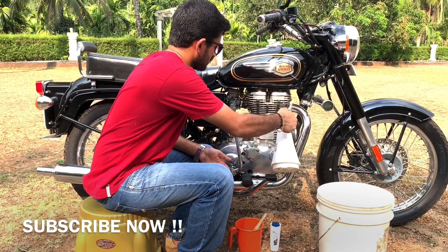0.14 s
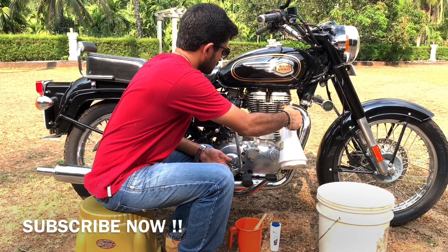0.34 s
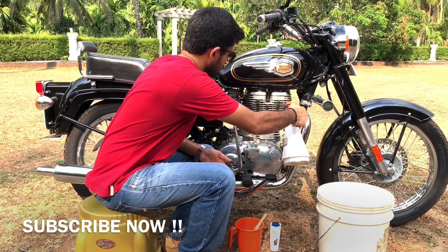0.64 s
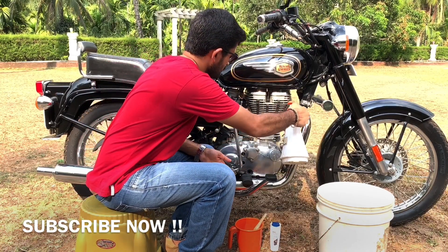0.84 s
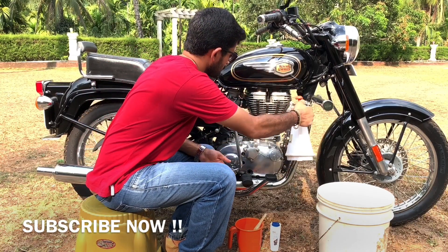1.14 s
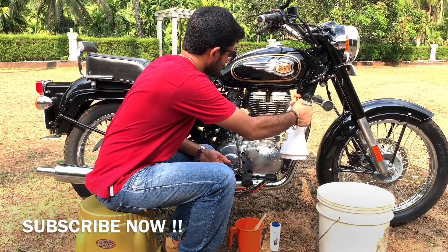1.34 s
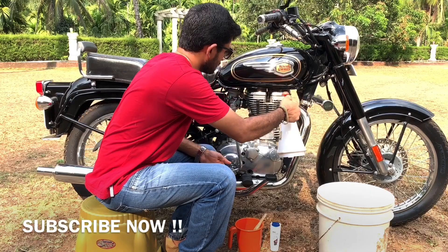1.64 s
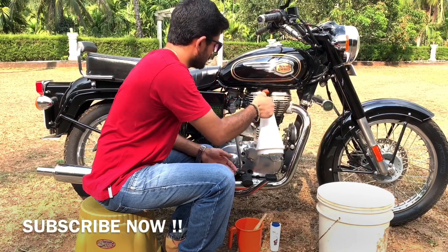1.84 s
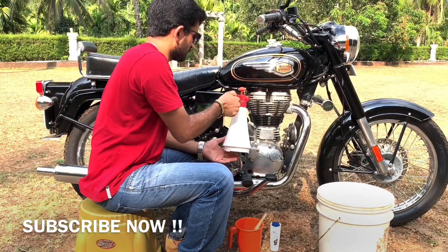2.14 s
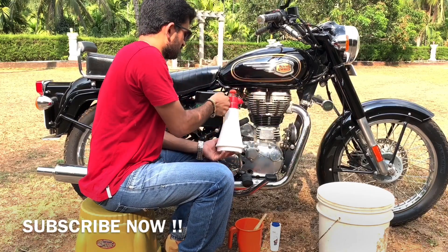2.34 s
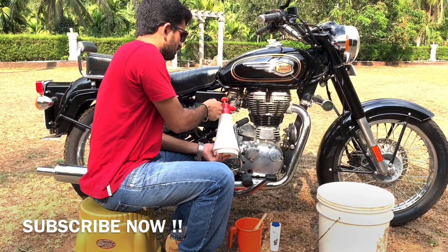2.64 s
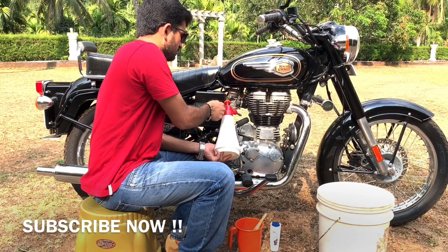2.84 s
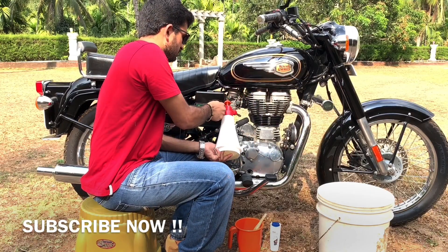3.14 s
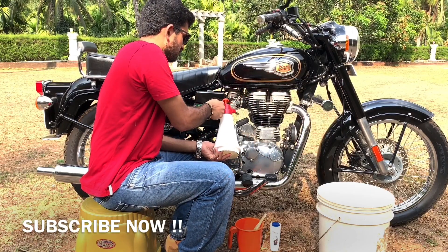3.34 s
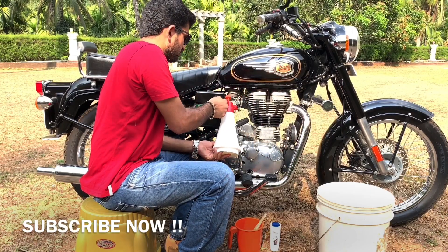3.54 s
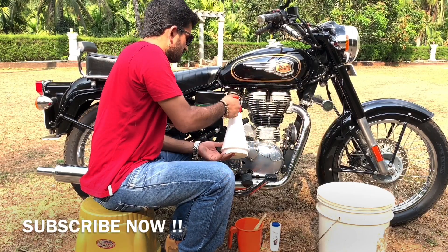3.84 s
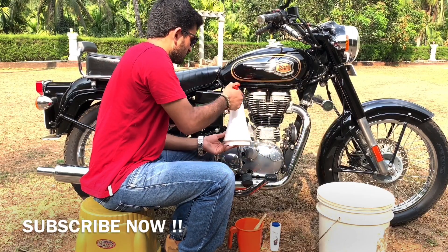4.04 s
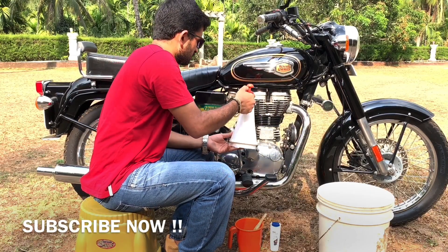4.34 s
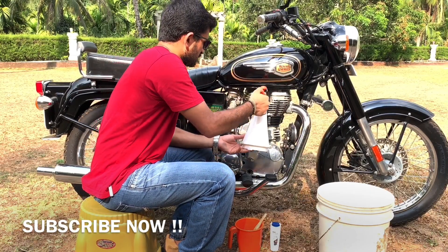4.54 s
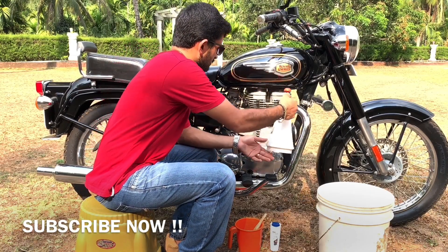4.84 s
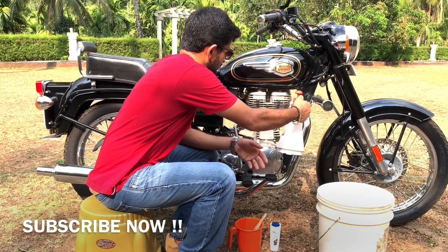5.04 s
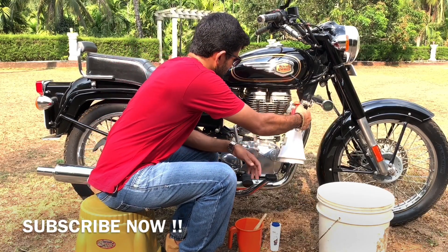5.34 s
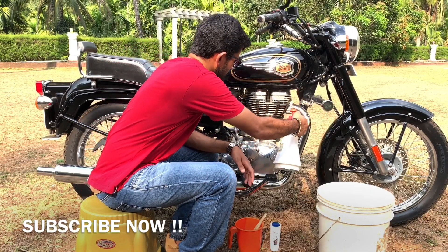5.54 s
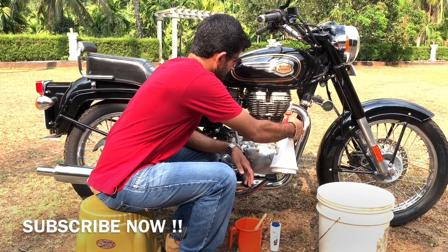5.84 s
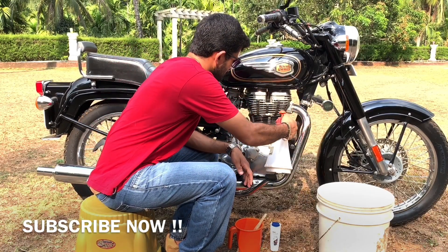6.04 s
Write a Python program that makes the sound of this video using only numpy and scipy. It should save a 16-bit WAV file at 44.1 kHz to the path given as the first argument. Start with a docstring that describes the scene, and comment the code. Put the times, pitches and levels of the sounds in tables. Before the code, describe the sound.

Close, steady fine spray hiss, shifting in colour and briefly faltering, over a quiet garden; midway, small plastic trigger ticks and dull wind thumps.

```python
"""A fine mist hisses, sputters and falters in a garden, a few steps from the microphone: a hand sprayer on an engine.
The spray is noise roughened by droplet hits, in three bands (hiss, patter, low body), coloured by echoes off
fins and covers as the nozzle wanders. The trigger ticks a few times: decaying rings, knocks and noise cracks.
Far off lie a wavering sine hum, a brief low tone and a noise murmur of leaves and traffic.
A light breeze, then a gust, buffets the microphone: low noise and short thumps."""
import sys
import numpy as np
from scipy import signal
from scipy.fft import rfft, irfft, next_fast_len
from scipy.io import wavfile
from scipy.ndimage import uniform_filter1d, map_coordinates

SR = 44100
rng = np.random.default_rng(int(sys.argv[2]) if len(sys.argv) > 2 else 0)


def wav_out(sig):
    """Save sig, one row per channel (or a flat mono array), as 16-bit PCM at SR to the path in sys.argv[1]."""
    wavfile.write(sys.argv[1], SR, np.round(np.clip(np.atleast_2d(sig).T, -1, 1) * 32767).astype(np.int16))


N = 272538

# Murmur of far leaves and traffic. Each row: time in seconds, level in dB.
GARDEN_LEVEL = [(0, -54.5), (1.3, -59), (3, -55.5), (6.18, -61)]
# Its spectrum. Each row: frequency in Hz, relative density in dB per Hz.
GARDEN_SPECTRUM = [(60, -11), (100, 2), (160, -2), (220, -7), (310, -6.5), (450, -10), (700, -12),
                   (2000, -22), (8000, -92)]
# Distant hum, swelling and sinking away. Each row: time in seconds, level in dB.
HUM_LEVEL = [(0, -76), (.9, -77), (1.2, -59), (1.7, -69), (2.05, -57.5), (2.7, -64), (2.97, -56),
             (3.1, -70), (3.53, -57.5), (3.8, -82)]
# Brief low tone from far off. One row: start in seconds, end in seconds, pitch in Hz, level in dB.
FAR_TONE = (0.4, .72, 306, -67)
# A light breeze, then the gust. Each row: time in seconds, level in dB.
WIND_LEVEL = [(0, -68), (.6, -59.5), (.9, -65.5), (1.2, -57), (1.6, -61), (3.7, -61.5), (3.82, -58),
              (3.89, -45), (3.99, -36), (4.29, -36.5), (4.36, -39), (4.42, -34.5), (4.65, -43),
              (4.93, -34.5), (5.04, -52), (5.1, -35), (5.19, -45), (5.45, -28.5), (5.53, -46),
              (5.61, -37.5), (5.9, -52.5), (6.18, -55)]
# Wind on the microphone. Each row: frequency in Hz, relative density in dB per Hz.
WIND_SPECTRUM = [(15, -40), (25, -14), (40, 0), (55, 4), (80, -1.5), (120, -19), (170, -24.5), (260, -53),
                 (400, -90)]
# Eddies that strike the microphone. Each row: centre in seconds, peak of the swell in dB, pitch in Hz.
THUMPS = [(1.268, -33, 58.4), (4.024, -17.5, 68.4), (4.107, -25, 75), (4.267, -24, 55.3),
          (4.408, -23.5, 54), (4.56, -25, 66), (4.877, -27, 76), (5.362, -29, 60.5), (5.419, -21.5, 56),
          (5.457, -23, 69), (5.621, -30.5, 58.6)]
# Trigger ticks. Each row: start in seconds, peak of the ring in dB, ring in Hz.
TICKS = [(4.078, -30.5, 1340), (4.2642, -32, 1340), (4.3266, -23.5, 2200), (4.504, -32, 1330),
         (4.5634, -24.5, 2280), (5.0569, -33, 1960)]
# The jet as the aim wanders. Each row: time in seconds, level of the hiss in dB, of the patter in dB,
# of the low body in dB, weight of the lower hiss in dB.
FLOW = [(0, -26.5, -37.5, -50, 5), (.2, -24.5, -33.5, -46.5, -2.5), (.45, -24.5, -41, -48.5, -1.5),
        (.65, -21, -36, -45, -0.5), (.95, -27.5, -37.5, -50, -1), (1.3, -22.5, -36.5, -49.5, 0.5),
        (1.7, -25, -37.5, -49, 0), (2.05, -19.5, -37, -49.5, -1), (2.4, -22.5, -38, -48.5, 4),
        (2.75, -21.5, -37.5, -48, 3.5), (3.05, -22.5, -36.5, -45.5, 4.5), (3.3, -20.5, -38, -47.5, 2.5),
        (3.7, -23.5, -37, -50, 2.5), (3.85, -21.5, -36, -49, 0.5), (3.97, -31, -49.5, -56.5, -1.5),
        (4.08, -25, -40, -47.5, 4), (4.32, -21, -36.5, -49, -6.5), (4.5, -25.5, -39.5, -49, 1),
        (4.85, -24, -37.5, -47.5, -3), (5.05, -24, -38, -49.5, -3), (5.45, -23.5, -37, -46.5, -6.5),
        (5.8, -25.5, -37.5, -46.5, 0.5), (6.18, -25, -37.5, -46, 1)]
# Spectra of the three layers. Each row: frequency in Hz, relative density in dB per Hz.
HISS_SPECTRUM = [(3500, -26), (5000, -14.5), (6200, -8), (7400, -2.5), (8000, -0.5), (9200, -1), (11000, 1),
                 (12500, -2), (15700, 0.5)]
PATTER_SPECTRUM = [(600, -40), (900, -3), (1500, 0), (2600, 1), (3300, 1.5), (4500, -0.5), (6000, -4),
                   (8000, -54)]
BODY_SPECTRUM = [(250, -24), (420, -6), (580, 2.5), (720, 0.5), (950, 2), (1200, -12), (1600, -41)]
# The jet chokes and comes back. Each row: least flow at seconds, depth in dB, time constant of the sag in
# seconds, time constant of the return in seconds.
FALTERS = [(.935, 3.5, .014, 0.013), (1.64, 10.5, 0.0083, .013), (1.71, 7, 0.0052, 0.033),
           (1.988, 6, 0.013, 0.0019), (2.3, 5.5, 0.014, 0.014), (2.836, 5, 0.0026, 0.073),
           (3.61, 4, 0.005, 0.066), (3.88, 7, 0.021, 0.024), (3.989, 15, 0.027, 0.003),
           (4.485, 10.5, .0044, 0.013), (5.031, 9, 0.027, 0.027), (5.59, 5, 0.0077, 0.021),
           (5.66, 9.5, 0.013, 0.013), (5.845, 5, 0.017, 0.0065)]
# Nozzle to nearest metal, which sets the mean delays of the ENGINE_ECHOES.
# Each row: time in seconds, distance in metres.
NOZZLE_DISTANCE = [(0, .1), (1.7, .08), (2.3, .1), (3, .075), (3.6, .098), (4.5, .08), (5.5, .11),
                   (6.18, .1)]
# Engine surfaces. Each row: path as a multiple of that distance, mean echo level in dB.
ENGINE_ECHOES = [(.6, -14), (1, -11), (1.5, -12), (2.3, -13)]
# Band coloured by the echo off the lawn, mostly a notch; it moves with the height of the nozzle.
# Each row: time in seconds, centre in Hz, lift in dB.
LAWN_NOTCH = [(0, 1150, -8), (1, 1010, -10), (1.6, 910, -6.5), (1.9, 840, -18), (2.4, 920, -17),
              (3, 976, -12), (3.7, 990, -14.5), (4.1, 800, -10), (4.7, 860, -8.5), (5.5, 1090, 2),
              (6.18, 1100, -1)]
# Band cancelled by the nearest metal face, higher as the nozzle comes closer.
# Each row: time in seconds, centre in Hz, lift in dB.
FACE_NOTCH = [(0, 3850, -10), (.2, 3900, 0), (.45, 4770, -5), (1.7, 4860, -5), (1.95, 4960, -17),
              (2, 3200, -7), (2.3, 3870, -4), (2.7, 5430, -9), (2.95, 5840, -6), (3.5, 3540, -3.5),
              (3.9, 4200, -7), (4.5, 3200, -3), (4.65, 2580, -1), (5.08, 3460, -12), (5.55, 3420, -5.5),
              (6.18, 3850, -5)]
# Gaps between fins that sing, or swallow sound, while the mist passes.
# Each row: start in seconds, end in seconds, centre in Hz, lift in dB.
FIN_GAPS = [(.25, .9, 3490, 6), (0.473, 0.794, 1550, 6), (.82, 1.62, 2260, -5), (2.3, 3.9, 2590, -5),
            (2.6, 3.5, 3080, -3), (.82, 1.62, 1920, 5), (.9, 1.6, 3300, 3), (1.07, 1.57, 4900, 11),
            (1.802, 2.292, 1720, 9), (2.05, 2.45, 3100, 6.5), (2.55, 3.4, 1280, 3), (2.75, 3.24, 4310, 7),
            (3.052, 3.45, 3360, 6.5), (2.605, 3.3, 6250, 3), (3.495, 3.9, 3880, 4),
            (4.057, 4.278, 1735, 10.5), (4.307, 4.62, 2270, 1), (5.066, 6.167, 1487, 9.5),
            (4.95, 5.2, 5600, 6), (5.2, 6.05, 4760, -12), (5.3, 6.18, 1890, 5.5)]
# Echoes from inside the engine that comb the sound into even bands, stretching as the nozzle moves.
# Each row: start in seconds, end in seconds, one band in Hz, spacing in Hz, stretch factor by the end, echo in dB.
COMBS = [(0, 0.284, 2340, 2380, 1.14, -8), (0, 0.307, 3280, 1430, 0.99, -12),
         (0.288, 0.835, 3620, 2000, 0.9, -12), (.3, 0.832, 2680, 1030, 0.84, -15),
         (0.817, 1.63, 3210, 1480, 1.02, -7), (0.827, 1.63, 2820, 780, .9, -11),
         (1.63, 2.404, 3050, 840, 1.4, -13), (2.4, 2.7, 3190, 580, 1.15, -11),
         (2.7, 3.45, 3320, 966, 1.01, -11.5), (2.702, 3.45, 2820, 507, 0.95, -10),
         (3.45, 3.97, 2100, 1830, 0.83, -7), (3.97, 4.6, 2890, 538, 0.99, -10),
         (4.614, 5.12, 3580, 2380, 1.58, -5.5), (4.6, 5.104, 2953, 577, 1.093, -6),
         (5.1, 5.6, 2850, 762, 1.22, -6.5), (5.6, 6.18, 3060, 730, 0.93, -13),
         (5.6, 6.18, 3290, 884, 1.03, -15)]
# Phase between the channels. Each row: frequency in Hz, right against left in half turns.
CHANNEL_PHASE = [(100, .05), (700, .2), (1500, .08), (2300, 0), (5000, 0), (6400, .2), (7300, .45),
                 (8150, 1), (8950, 1), (10400, 2), (11600, 2), (12850, 3), (13850, 3), (15200, 4),
                 (17000, 4)]
# How far the channels differ. Each row: frequency in Hz, mixing angle of the unlike part in half radians.
CHANNEL_DIFFERENCE = [(100, 0.1), (800, 0.46), (1500, 0.22), (2300, 0.015), (3200, 0.14), (4300, 0.38),
                      (5300, 0.8), (6500, 0.25), (9000, 0.53), (15000, 0.29)]

HUM_HZ, HUM_WAVER_HZ = 96, 1.97
THUMP_CYCLES = 0.65  # half length of a thump, in cycles of its pitch
TICK_RISE_S, TICK_T60_S = .001, 0.018
FADE_S = 0.073
LAWN_WIDTH_HZ, FACE_WIDTH_HZ, GAP_WIDTH_HZ = 116, 274, 137
COMB_LOW_HZ, COMB_TOP_HZ = 895, 5370
SOUND_SPEED_M_S = 343
TOP_HZ = 15750
HOP = 256  # samples between spectral frames
HZ = np.fft.rfftfreq(4 * HOP, 1 / SR)[:, None]
TIMES = np.arange(N // HOP + 3) * HOP / SR


def amp(db):
    """Amplitude of a level in dB."""
    return 10 ** (np.asarray(db) / 20)


def unit(x):
    """Scale to rms 1."""
    return x / np.sqrt(np.mean(np.abs(x) ** 2) + 1e-20)


def along(points, hz):
    """Read (Hz, value) points on a log frequency axis."""
    f, v = np.transpose(points)
    return np.interp(np.log(hz + 1), np.log(f + 1), v)


def curves(rows, at):
    """Read each column after the time at the given seconds."""
    s, *columns = np.transpose(rows)
    return [np.interp(at, s, column) for column in columns]


def wobble(rate, at):
    """A smooth random curve with rate knots a second."""
    knots = rng.standard_normal(int(at[-1] * rate) + 4)
    return map_coordinates(knots, [at * rate])


def bump(hz, centre, width):
    """A bell of height 1 on the frequency axis."""
    return np.exp(-((hz - centre) / width) ** 2)


def patches(bins, frames):
    """A random field of rms 1 over frequency and time, smoothed over so many bins and frames."""
    field = rng.standard_normal((len(HZ), len(TIMES)))
    for _ in range(2):
        field = uniform_filter1d(field, size=bins, axis=0)
        field = uniform_filter1d(field, size=frames, axis=1)
    return unit(field)


def shaped(x, gain):
    """Apply a gain that varies with frequency and time."""
    z = signal.stft(x, nperseg=4 * HOP, noverlap=3 * HOP)[2]
    z = z * gain[..., :z.shape[-1]]
    return signal.istft(z, nperseg=4 * HOP, noverlap=3 * HOP)[1][..., :N]


def filtered(x, response):
    """Apply a steady response of frequency."""
    m = next_fast_len(N + SR // 4)
    return irfft(rfft(x, m) * response(np.fft.rfftfreq(m, 1 / SR)), m)[..., :N]


def air(points, unlike):
    """Stereo noise of rms 1, mostly shared by the channels."""
    noise = rng.standard_normal((2, N))
    mid, side = filtered(noise, lambda hz: amp(along(points, hz)))
    return unit(np.array([mid + unlike * side, mid - unlike * side]))


def garden():
    """Leaves and traffic at a distance, blended into a soft murmur of mostly low noise."""
    level_db, = curves(GARDEN_LEVEL, np.arange(N) / SR)
    return amp(level_db) * air(GARDEN_SPECTRUM, unlike=0.42)


def hum():
    """A faint sine from far off that wavers in pitch and level, and one brief higher tone."""
    at = np.arange(N) / SR
    start, end, tone_hz, tone_db = FAR_TONE
    on = np.clip(np.minimum(at - start, end - at) / FADE_S, 0, 1)
    tone = on * amp(tone_db + 2.5 * wobble(5.2, at)) * np.sin(2 * np.pi * tone_hz * at)
    hz = HUM_HZ + HUM_WAVER_HZ * wobble(3, at)
    hum_db = curves(HUM_LEVEL, at)[0] + 1.5 * wobble(7.2, at)
    low = amp(hum_db) * np.sin(2 * np.pi * np.cumsum(hz) / SR)
    return np.sqrt(2) * (low + tone)  # sine peak from rms


def wind():
    """Turbulence at the microphone: lumpy low noise, and eddies as short thumps a little early on the left."""
    at = np.arange(N) / SR
    gust_db, = curves(WIND_LEVEL, at)
    lead = np.array([[.3], [-.3]])  # radians, left and right
    thumps = 0
    for s, db, hz in THUMPS:
        swell = np.exp(-((at - s) * hz / THUMP_CYCLES) ** 2)
        thumps = thumps + amp(db) * swell * np.cos(2 * np.pi * hz * (at - s) + lead)
    return amp(gust_db + 2.0 * wobble(29, at)) * air(WIND_SPECTRUM, unlike=0.48) + thumps


def trigger():
    """Small plastic ticks: a brief ring and a low knock under a crack of noise, all dying away."""
    out = np.zeros(N + SR)
    t = np.arange(SR // 20) / SR
    for s, db, hz in TICKS:
        ring = np.sin(2 * np.pi * hz * t) * amp(-60 * t / TICK_T60_S) * (1 - np.exp(-t / TICK_RISE_S))
        knock = 0.31 * np.sin(2 * np.pi * 700 * t) * amp(-60 * t / 0.049)
        crack = rng.standard_normal(len(t)) * amp(-60 * t / 0.0066)
        tick = ring / np.abs(ring).max() + knock + crack
        out[round(s * SR):][:len(t)] += amp(db) * tick
    return out[:N]


def droplets(rate, spread_db, share):
    """Two rows of white noise roughened by droplet impacts of uneven size, at the same moments in both."""
    hits = (rng.random(N) < rate / SR) * amp(spread_db * rng.standard_normal(N))
    swell = np.convolve(hits, np.hanning(round(0.00074 * SR)), "same")
    return unit(rng.standard_normal((2, N)) * (1 - share + share * unit(swell)))


def choke():
    """Gain of the flow: it sputters, sags into each falter and recovers; a sudden return spits for a moment."""
    at = np.arange(N) / SR
    sputter_db = 1.16 * wobble(6, at) + 0.7 * wobble(18, at) + .5 * wobble(60, at)
    falter_db, spit = 0, 0
    for s, db, sag, back in FALTERS:
        falter_db = falter_db + db * np.exp(-np.abs(at - s) / np.where(at < s, sag, back))
        if back < .0035:
            burst = s + .004
            spit = spit + (at > burst) * np.exp(-np.abs(at - burst) / 0.021)
    spit_db = (0.28 + 4 * wobble(190, at)) * spit
    return amp(sputter_db + spit_db - falter_db)


def reflected_colour():
    """Lift in dB where reflections add or cancel: two gliding bands, then combs and fin gaps that fade in and out."""
    def on(start, end):
        return np.clip(np.minimum(TIMES - start, end - TIMES) / FADE_S + .5, 0, 1)

    lift = 0
    for notch, width in (LAWN_NOTCH, LAWN_WIDTH_HZ), (FACE_NOTCH, FACE_WIDTH_HZ):
        hz, db = curves(notch, TIMES)
        lift = lift + db * bump(HZ, hz, width)
    band = np.exp(-(HZ / COMB_TOP_HZ) ** 4) / (1 + (COMB_LOW_HZ / (HZ + 1)) ** 6)
    for start, end, hz, spacing, stretch, db in COMBS:
        slid = HZ / np.interp(TIMES, [start, end], [1, stretch])
        echo = amp(db) * band * on(start, end)
        ripple = np.cos(2 * np.pi * (slid - hz) / spacing)
        # power of the direct sound plus one echo
        lift = lift + 10 * np.log10(1 + echo ** 2 + 2 * echo * ripple + 1e-3)
    for start, end, hz, db in FIN_GAPS:
        lift = lift + db * on(start, end) * bump(HZ, hz, GAP_WIDTH_HZ)
    return lift


def engine_echoes():
    """Response of the direct spray plus delayed, wavering returns from metal a hand's breadth from the nozzle."""
    delay = 2 * curves(NOZZLE_DISTANCE, TIMES)[0] / SOUND_SPEED_M_S  # there and back
    echoes = 0
    for multiple, db in ENGINE_ECHOES:
        level = amp(db + 2.65 * wobble(4.97, TIMES))
        path_delay = delay * multiple * (1 + 0.053 * wobble(4, TIMES))
        echoes = echoes + level * np.exp(-2j * np.pi * HZ * path_delay)
    # small surfaces reflect only short waves
    return unit(1 + echoes * np.clip(HZ / 7000, 0, 1) ** 2)


def spray():
    """Hiss, patter and body share one sputtering flow and set of echoes; two rows: common and unlike part."""
    def layer(points, lift_db, level_db):
        gain = amp(along(points, HZ) + lift_db)
        return gain / np.sqrt(np.mean(gain ** 2, axis=0)) * amp(level_db)

    hiss_db, patter_db, body_db, weight_db = curves(FLOW, TIMES)
    lift = reflected_colour()
    hiss = layer(HISS_SPECTRUM, lift + weight_db * bump(HZ, 6800, 1300), hiss_db)
    patter = layer(PATTER_SPECTRUM, lift, patter_db)
    body = layer(BODY_SPECTRUM, lift, body_db)
    colour = np.sqrt(hiss ** 2 + patter ** 2 + body ** 2)
    patchy_db = 2.7 * np.clip(HZ / 5500, .3, 1) * patches(bins=3, frames=7)
    patchy_db = patchy_db + 0.72 * patches(bins=60, frames=3) + 1.7 * patches(bins=2, frames=40)
    mist = droplets(rate=1100, spread_db=2.0, share=0.14)
    return choke() * shaped(mist, colour * engine_echoes() * amp(patchy_db))


def stereo_phase(common, unlike):
    """The two channels fall out of step above 6 kHz, in bands that match or mirror, and are partly unlike."""
    turn = np.pi * along(CHANNEL_PHASE, np.abs(HZ + 170 * patches(bins=18, frames=5)))
    loose = np.clip(along(CHANNEL_DIFFERENCE, HZ) * amp(3 * patches(bins=12, frames=12)), 0, 1.5)
    # above 7 kHz, alike wherever they match or mirror
    loose = loose * np.where(HZ > 7000, np.abs(np.sin(turn)), 1)
    tilt = amp(-2.5 * bump(HZ, 5300, 900))  # the common part leans right here
    sides = []
    for sign in (-1, 1):  # left, right
        phase = np.exp(sign * .5j * turn)
        shared = shaped(common, np.cos(loose / 2) * phase * tilt ** -sign)
        own = shaped(unlike, np.sin(loose / 2) * 2 * phase)
        sides.append(shared + sign * own)
    return np.array(sides)


def scene():
    """Spray and trigger, spread in stereo, over wind, far hum and garden."""
    common, unlike = spray()
    near = stereo_phase(common + trigger(), unlike)
    return near + wind() + hum() + garden()


def record(dry):
    """The recorder keeps nothing from its band limit upwards."""
    return filtered(dry, lambda hz: hz < TOP_HZ)


dry = scene()
out = record(dry)
wav_out(out)
```